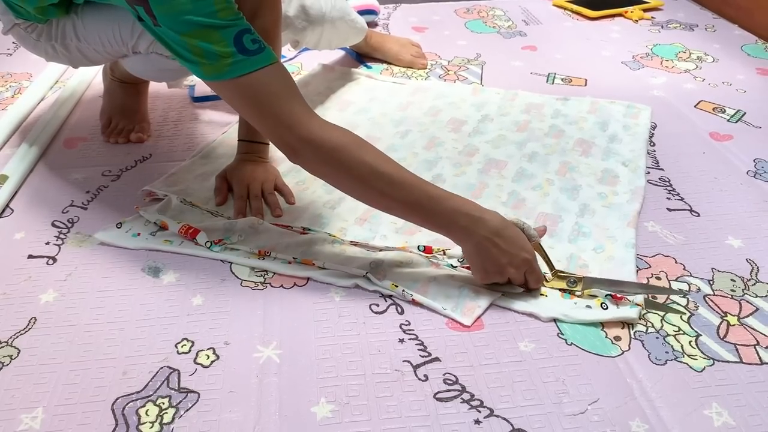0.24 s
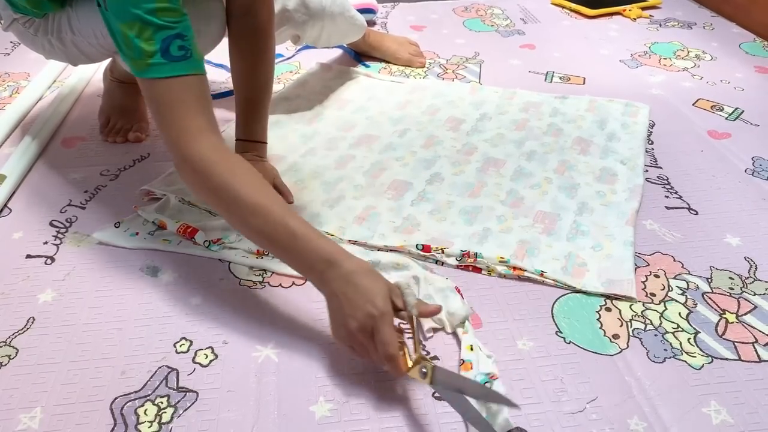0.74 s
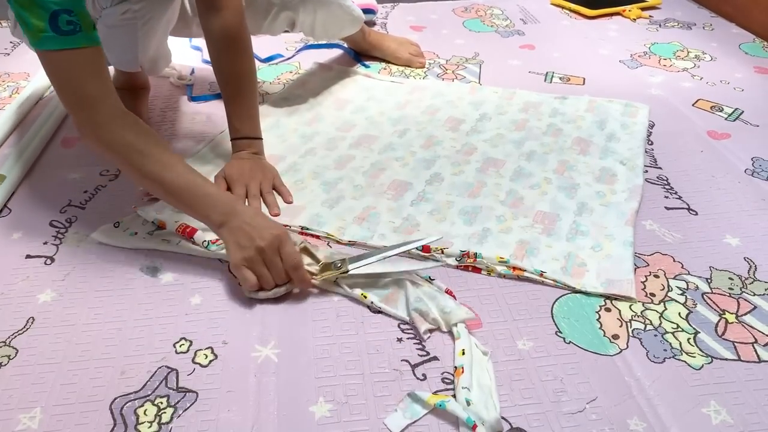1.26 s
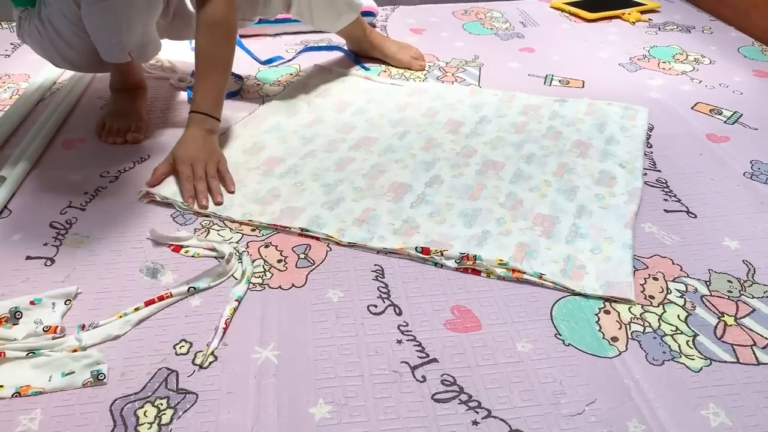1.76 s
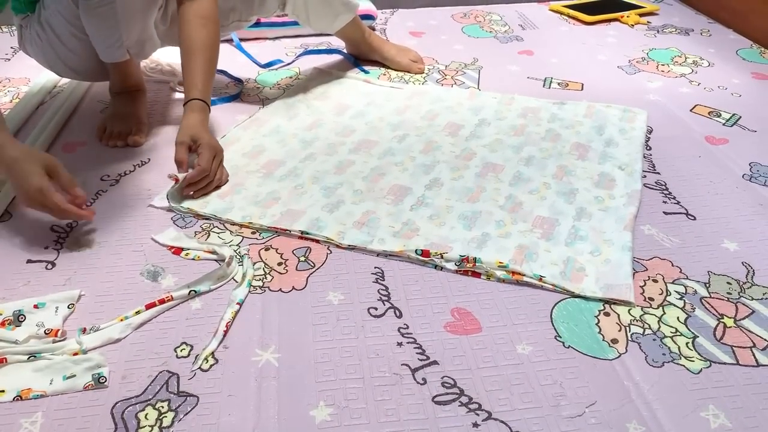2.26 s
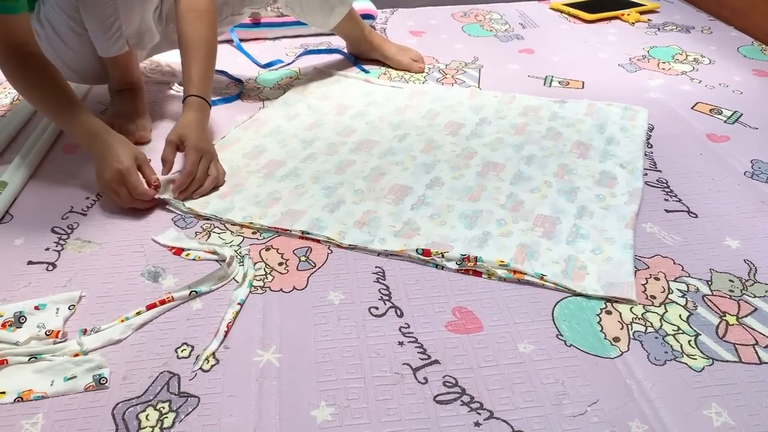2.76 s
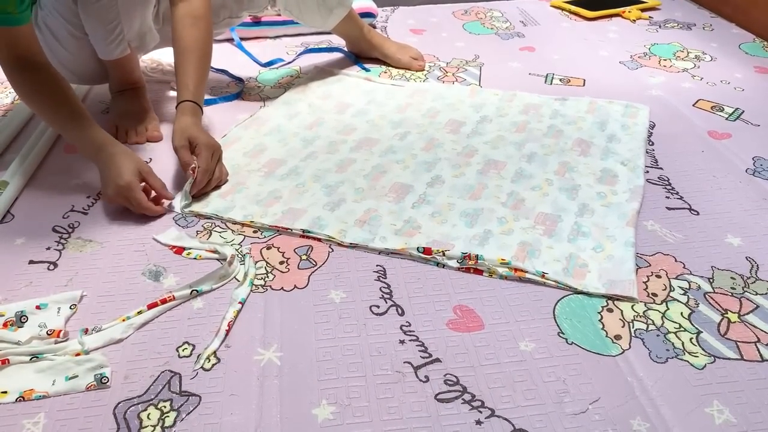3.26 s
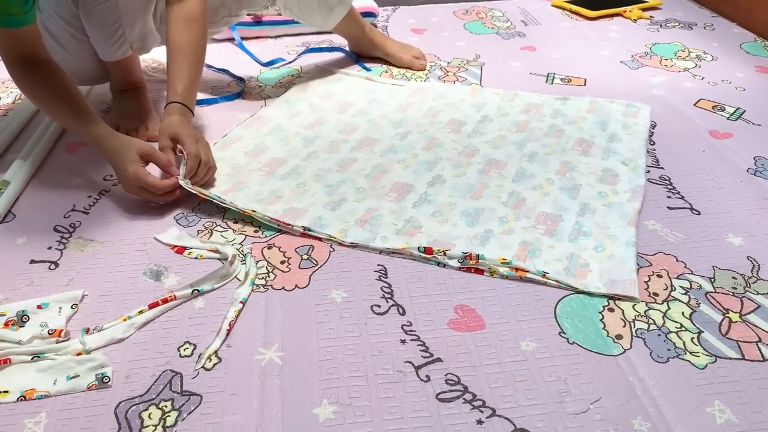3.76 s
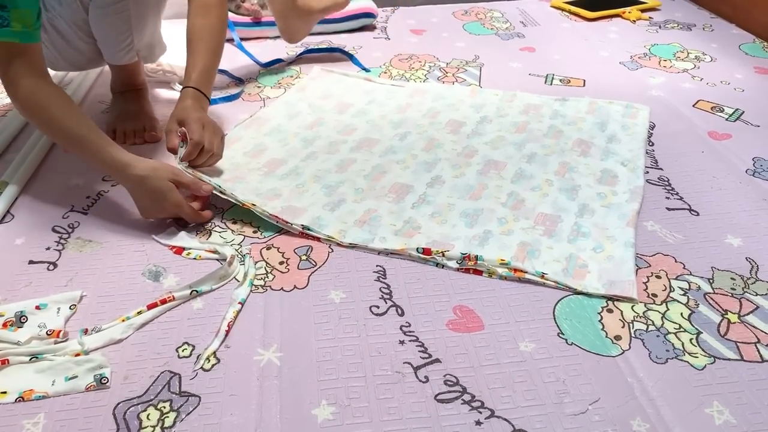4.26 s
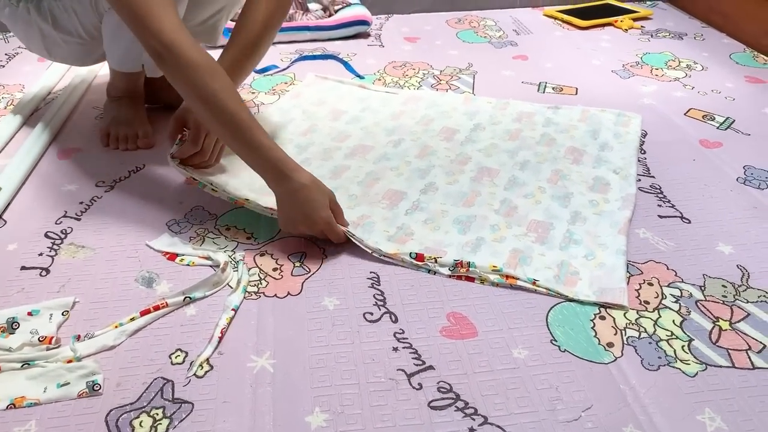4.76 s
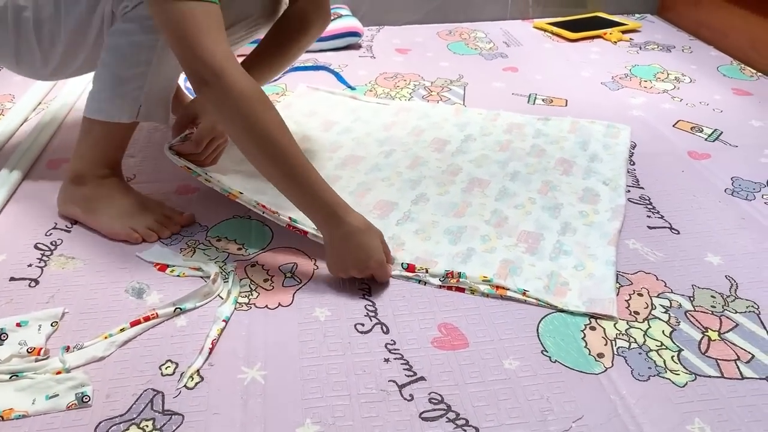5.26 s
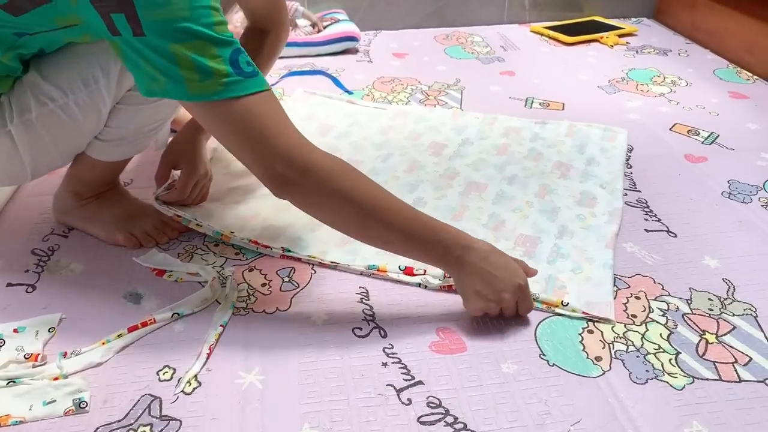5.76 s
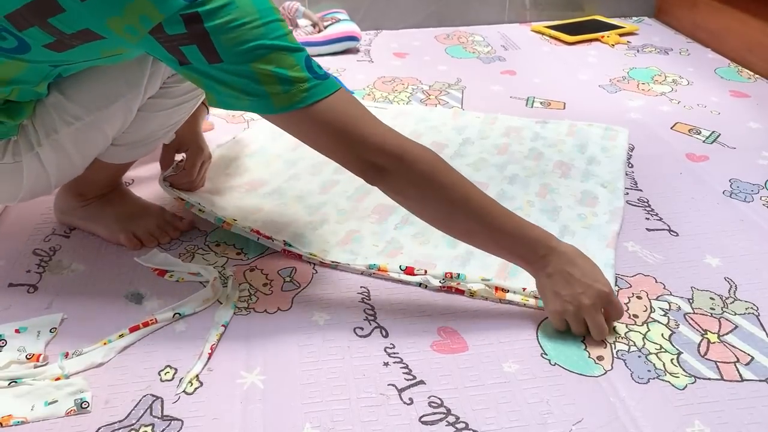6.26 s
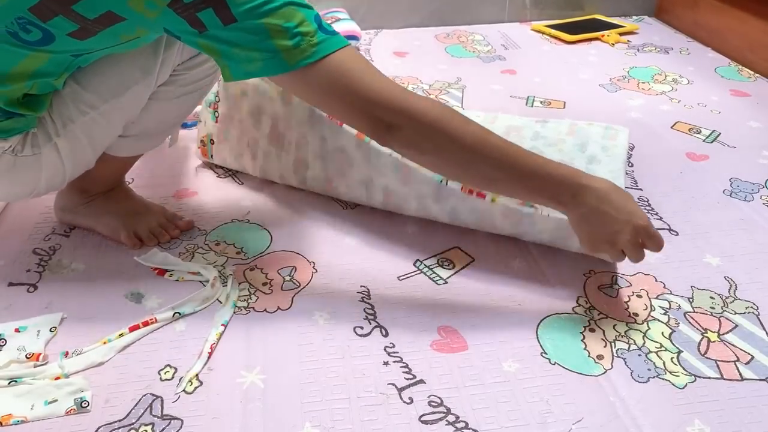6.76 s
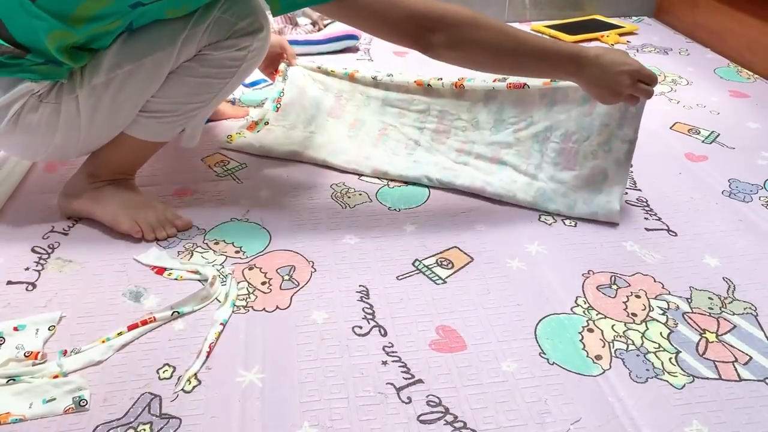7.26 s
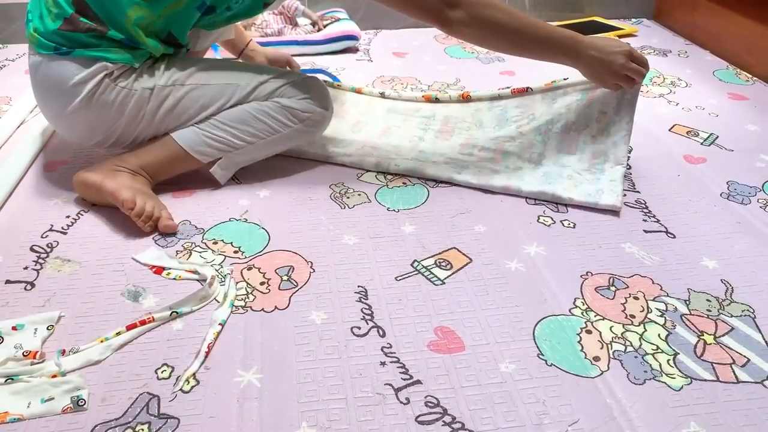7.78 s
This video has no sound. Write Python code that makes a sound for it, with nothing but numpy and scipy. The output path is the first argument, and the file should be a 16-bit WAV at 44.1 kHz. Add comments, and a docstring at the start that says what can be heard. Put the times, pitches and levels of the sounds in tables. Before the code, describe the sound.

Scissors snip crisply through cotton and clatter onto a foam mat, then hands rustle and sweep the cloth over a faint indoor hum.

```python
"""Scissors, cloth and foam mat

Large scissors finish a cut through cotton and are dropped on a foam mat; hands and feet then slide over
cloth and mat. Rubbing is band-filtered noise shaped by strokes; snips, drops and ticks are noise bursts in
damped resonances, answered by a hard-walled room. Heels and knees thud as decaying sines, a fan hums as
narrow noise bands in steady air noise, and a far horn gives a brief run of blasts from two overtones."""
import sys
import numpy as np
from scipy import signal
from scipy.fft import rfft, irfft, next_fast_len
from scipy.io import wavfile
from scipy.ndimage import uniform_filter1d, map_coordinates

SR = 44100
rng = np.random.default_rng(int(sys.argv[2]) if len(sys.argv) > 2 else 0)


def materialize(psi):
    """Save the field psi as 16-bit PCM at rate SR to the path in sys.argv[1].

    A 1-D psi becomes a single channel; in a 2-D psi each row is a channel.
    """
    bounded = np.clip(np.atleast_2d(psi).T, -1, 1)
    quanta = np.round(bounded * 32767).astype(np.int16)
    wavfile.write(sys.argv[1], SR, quanta)


N = 353682  # samples in the scene

# Spectrum of steady air and street noise: (frequency [Hz], relative level per Hz [dB])
AIR_SPECTRUM = [(12, -81.5), (28, -34), (48, -7.5), (113, 0), (171, -10), (343, -8.5), (507, -19.5),
                (689, -16), (1780, -30.5), (3770, -46), (6000, -52), (16000, -60)]
AIR_LEVEL_DB = -49
# Hum bands of the fan: (centre [Hz], width [Hz], rms level before any waver [dB])
FAN_BANDS = [(47.3, 12, -59), (104.5, 6, -49), (195, 25, -65.5), (358, 100, -63), (682, 55, -69)]
# Random waver of the strongest hum band, as narrow noise has, used relative to its mean:
# (time [s], level [dB])
HUM_WAVER = [(0.0, -45.5), (1.54, -57), (1.79, -40), (1.96, -55), (2.26, -48), (2.72, -61), (2.88, -40.5),
             (2.95, -50.5), (5.43, -43), (5.69, -52), (6.59, -44), (8.02, -50)]
# Correlation of left and right in diffuse noise: (frequency [Hz], likeness [0 to 1])
LIKENESS = [(60, 0.92), (180, 0.96), (550, 0.61), (1650, 0.053), (4970, 0.016), (15000, 0.037)]

# Strokes of hands, feet and blades over cloth and mat: (time at full level [s], rise [s], hold [s],
# drift over the hold [dB], scrape level [dB], swish, hiss and rasp levels above the scrape [dB, dB, dB])
STROKES = [(0.078, 0.33, 0.079, -16, -54, -3, 9, -18), (0.213, 0.012, 0.035, 1, -69.5, -4, 3, -3),
           (0.485, 0.057, 0.028, 7, -47.5, -7, -5.5, -3), (0.51, 0.192, 0.11, 11, -57, -7.5, -6, -12),
           (0.717, 0.006, 0.037, 3, -67.5, -13, -5, -14), (0.973, 0.015, 0.031, -10, -54, -6, -1, 5),
           (1.069, 0.081, 0.22, -16, -33, -12.5, -17, -3), (1.401, 0.28, 0.28, -7, -44.5, -8.5, -8.5, -13),
           (1.778, 0.042, 0.08, -11, -40, -15, -15, -3.5),
           (1.922, 0.055, 0.0039, 6.5, -52.5, -9, -1.5, -13), (2.337, 0.027, 0.082, -9, -62.5, 1, -6.5, -2),
           (2.529, 0.12, 0.067, 3, -54, -2.5, -4, -9), (2.606, 0.009, 0.16, -20, -41, -8.5, -9, 0.5),
           (2.8, 0.077, 0.036, -4, -41.5, -7, -7.5, -8), (3.188, 0.016, 0.085, 2, -73, -9.5, -13.5, -18),
           (3.328, 0.014, 0.039, 5, -80.5, -7, -8.5, -19.5),
           (3.558, 0.075, 0.094, -17.5, -79.5, 4.5, -9, -14.5),
           (3.891, 0.032, 0.11, -10.5, -51, 2.5, -8, -11), (4.321, 0.077, 0.17, 3, -56.5, -6, -4, -11),
           (4.483, 0.015, 0.18, 4.5, -67, -8.5, 0.5, -9), (4.741, 0.048, 0.32, 12, -74, 9, 9, -13),
           (4.848, 0.052, 0.15, -10.5, -39, 5, 1, -1), (4.936, 0.1, 0.34, -16.5, -35.5, -8, -15, -5),
           (5.161, 0.0055, 0.29, -8.5, -42.5, -2, -5, -2.5), (5.54, 0.44, 0.24, 6.5, -67, -5.5, -3, -25),
           (5.772, 0.04, 0.21, -2, -60.5, 1.5, 6.5, -15), (6.005, 0.43, 0.1, -12.5, -52, -8.5, -8, -7.5),
           (6.29, 0.188, 0.039, -8, -53.5, -12, -9, -8), (6.353, 0.021, 0.064, -3, -57, -22, -9.5, -0.5),
           (6.604, 0.068, 0.049, -5, -58.5, 0, -6.5, -9), (6.855, 0.15, 0.134, -1, -69, -5, -12, 0.5),
           (7.077, 0.083, 0.011, -5.5, -67, 2, 3, -7), (7.167, 0.038, 0.023, 0, -78.5, -2.5, -0.5, 1.5),
           (7.28, 0.055, 0.15, -24.5, -59.5, 2, 1, -22), (7.474, 0.066, 0.006, -6, -71, 7, -18, -6),
           (7.592, 0.13, 0.03, -2, -60, 2.5, 0.5, -8), (7.771, 0.32, 0.105, 11, -76.5, -3.5, -12, -5),
           (7.886, 0.048, 0.049, -1, -62.5, -8.5, -10.5, -1.5)]
# Rubbing bands scrape, swish, hiss, rasp: (low edge [Hz], high edge [Hz], fade after the stroke [dB/s])
RUBBING_BANDS = [(2300, 4490, 107), (5030, 6860, 130.5), (8300, 14000, 229), (1060, 2630, 90)]
# Spectrum of rubbed fabric: (frequency [Hz], relative level [dB])
FABRIC_SPECTRUM = [(500, -40), (900, -17), (1300, -15.5), (1900, -10), (2500, -5), (3500, -1), (4600, -3),
                   (5500, -6.5), (8000, -4), (16000, -14)]
STROKE_RISE_DB = 30  # climb during the rise

# Snips, drops and ticks, levels before the common gains below:
# (time [s], level [dB], ring [Hz], treble crack [dB], low knock [dB])
TICKS = [(0.22, -55, 6500, 12.5, -25), (0.376, -39.5, 2000, -16, -22), (0.482, -25.5, 3700, -14.5, -31),
         (0.4953, -21.5, 2120, -18.5, -39), (0.5096, -5, 2590, -9.5, -36), (0.52, -14, 4050, -26, -27),
         (0.9669, -16.5, 2620, -13, -34), (0.988, -34, 5100, -18.5, -28), (1.0229, -13.5, 3000, -9.5, -22),
         (1.0314, -4, 3270, -14, -26), (1.037, 2, 3800, -10, -20.5), (1.043, -11, 3170, -24, -10),
         (1.0487, -12, 4100, -18.5, -16), (1.0549, -3, 2640, -10, -18.5), (1.0686, -17.5, 2705, -22, -12.5),
         (1.2414, -38, 2980, -17, -21), (1.377, -16, 4940, -32, -35), (1.683, -30.5, 1460, -27, -10.5),
         (1.7734, -13, 4040, -19, -33), (1.9321, -21, 4090, -10, -35), (2.3285, -36.5, 2520, -7, -18),
         (2.583, -30, 4680, 8, -27), (2.591, -15.5, 5200, -4.5, -21.5), (2.6146, -23, 2600, -19, -27),
         (2.7818, -16.5, 4370, -8, -42), (3.8751, -36.5, 4150, -8.5, -24), (3.8879, -27, 4630, -2, -33),
         (4.797, -35, 6680, 3.5, -27), (4.8204, -28, 6000, 5.5, -32), (4.8522, -17, 3300, -3.5, -13.5),
         (4.982, -10.5, 2490, -13, -40), (5.1633, -13.5, 4030, -25.5, -20),
         (5.1698, -13.5, 2860, -25.5, -18), (5.982, -19.5, 3610, -22, -36), (6.268, -30, 3370, -25, -30),
         (6.3575, -30, 3400, -16, -29.5), (6.3787, -25, 3000, -26, -34), (6.4449, -32, 2600, -22, -16),
         (6.6036, -37.5, 6500, -20.5, -24), (7.0667, -40, 6500, 0, -23), (7.267, -29, 4140, -1.5, -31),
         (7.3111, -47, 3380, 9, -21), (7.4145, -62, 6030, 6, -25), (7.4496, -37, 6000, -31, -23),
         (7.5131, -55.5, 5940, 11, -23.5), (7.5478, -46.5, 6210, 8.5, -12.5),
         (7.5752, -29.5, 5700, -1.5, -29.5), (7.8148, -48, 5760, -30, -22.5)]
TICK_GAIN_DB, CRACK_GAIN_DB, KNOCK_GAIN_DB = 16.5, -5.5, 9.5
TICK_T60_S, TICK_BODY_DB, TICK_ROOM_DB = .013, -9, -13.5
# Path difference as the hands move: (time [s], lag of the left port [ms])
HAND_LAG = [(0, 0.28), (.9, 0.18), (1, -0.24), (1.9, -0.45), (2.4, 0.309), (8, 0.27)]
# Reverberation of the hard walls: (frequency [Hz], t60 [s])
WALL_DECAY = [(300, 0.78), (1300, 0.14), (3500, 0.23), (9000, 0.35), (15000, 0.21)]

# Heels and knees on the floor, levels before the common gain: (time [s], level [dB], pitch [Hz], t60 [s])
THUDS = [(1.037, -40, 191, 0.089), (1.78, -29, 121, 0.14), (1.777, -30, 194, 0.086),
         (2.279, -25, 108, 0.062), (4.152, -15.5, 58.9, 0.12), (4.216, -29, 45.7, 0.23),
         (5.168, -32, 189, 0.12)]
THUD_GAIN_DB = 3.5

# Blasts of the horn: (start [s], length [s], level [dB])
HORN_BLASTS = [(2.14, .03, -76.5), (2.18, .16, -63.5), (2.355, 0.046, -64), (2.428, 0.077, -65)]
# Overtones that carry: (multiple of the fundamental [1], level [dB])
HORN_TONES = [(7, -5.5), (8, -5)]
HORN_HZ, HORN_EDGE_S = 479, .02

# Treble colour of the whole sound: (frequency [Hz], gain [dB])
TREBLE_COLOUR = [(7500, 0.5), (8700, -1.5), (10300, 7.5), (11450, 1), (11950, -11), (12500, 5.5),
                 (14000, 3.5), (14700, -8), (15800, -20)]
BAND_LIMIT_HZ = 15795


def amp(db):
    """Decibel law: the amplitude factor of a level in dB."""
    return 10 ** (np.asarray(db) / 20)


def unit(x):
    """Power normalisation: x at rms 1."""
    return x / np.sqrt(np.mean(x ** 2) + 1e-20)


def along(points, hz):
    """Logarithmic frequency scale: (Hz, value) points interpolated on it."""
    f, v = np.transpose(points)
    return np.interp(np.log(hz + 1), np.log(f + 1), v)


def wobble(rate):
    """Band-limited fluctuation: a smooth random curve through `rate` knots a second."""
    knots = rng.standard_normal(int(N * rate / SR) + 4)
    return map_coordinates(knots, [np.arange(N) * rate / SR])


def filtered(x, response):
    """Linear filtering: the spectrum of x times a response of frequency."""
    m = next_fast_len(x.shape[-1] + 8192)
    spectrum = rfft(x, m) * response(np.fft.rfftfreq(m, 1 / SR))
    return irfft(spectrum, m)[..., :x.shape[-1]]


def mode(f, hz, width):
    """Damped oscillator: the response of a causal resonance with peak gain 1."""
    return 1j * f * width / (hz * hz - f * f + 1j * f * width + 1e-9)


def diffuse(gain, patchy_db=0):
    """Diffuse field: stereo noise of rms 1 in random patches, alike on both sides only in the bass."""
    cells = signal.stft(rng.standard_normal((2, N)), nperseg=512)[2]
    patches = rng.standard_normal(cells.shape[1:])
    patches = uniform_filter1d(uniform_filter1d(patches, 3, 0), 6, 1)
    pair = signal.istft(cells * amp(patchy_db * unit(patches)), nperseg=512)[1][:, :N]
    # the mid/side mixing angle sets the left-right correlation
    turn = lambda f: np.arccos(np.clip(along(LIKENESS, f), -1, 1)) / 2
    mid, side = filtered(pair, lambda f: gain(f) * [np.cos(turn(f)), np.sin(turn(f))])
    return unit(np.array([mid + side, mid - side]))


def room_tone():
    """Broadband noise and narrow-band hum: steady air plus fuzzy fan bands, a little louder right."""
    bands = []
    for hz, width, db in FAN_BANDS:
        bands.append(amp(db) * diffuse(lambda f: np.abs(mode(f, hz, width)) ** 2))
    low, main, *upper = bands
    waver_db = np.interp(np.arange(N) / SR, *np.transpose(HUM_WAVER))
    main = main * amp(waver_db - waver_db.mean())
    air = amp(AIR_LEVEL_DB) * diffuse(lambda f: amp(along(AIR_SPECTRUM, f)), patchy_db=1.93)
    return (air + low + main + sum(upper)) * amp([[-.4], [.4]])


def rubbing():
    """Stick-slip friction: fibres catch and slip in fine grains; the hiss fades fastest after a stroke."""
    columns = np.transpose(STROKES)[:, :, None]
    full, rise, hold, drift_db, scrape_db, swish_db, hiss_db, rasp_db = columns
    t = np.arange(0, N / SR + .002, .001)  # 1 ms grid for the envelopes
    slips_db = 2.1 * wobble(14) + 0.91 * wobble(55) + 0.55 * wobble(400)
    since, held = t - full, np.maximum(hold, .005)
    rise_db = STROKE_RISE_DB * np.minimum(since, 0) / np.maximum(rise, .004)
    hold_db = drift_db * np.clip(since / held, 0, 1)
    out = np.zeros((2, N))
    for (low_hz, high_hz, fade), above_db in zip(RUBBING_BANDS, [0, swish_db, hiss_db, rasp_db]):
        shape_db = rise_db + hold_db - fade * np.maximum(since - held, 0)
        # overlapping strokes add in power
        level = np.linalg.norm(amp(scrape_db + above_db + shape_db), axis=0)
        edges = lambda f: np.sqrt((1 + (low_hz / (f + 1)) ** 14) * (1 + (f / high_hz) ** 14))
        noise = diffuse(lambda f: amp(along(FABRIC_SPECTRUM, f)) / edges(f), patchy_db=3.0)
        out += np.interp(np.arange(N) / SR, t, level) * noise
    return out * unit(amp(slips_db))


def walls(length=SR // 2):
    """Reverberation: a fresh stereo tail, left energy 1, each frequency decaying at its own rate."""
    hz, t, cells = signal.stft(rng.standard_normal((2, length)), SR, nperseg=256)
    decay = amp(-60 * t / along(WALL_DECAY, hz)[:, None])
    tail = signal.istft(cells * decay, SR, nperseg=256)[1]
    return tail / np.linalg.norm(tail[0])


def ticks():
    """Impact excitation: brief chatter drives a ring, a broad body, a crack and a knock, then the room."""
    out, t = np.zeros((2, N + SR)), np.arange(SR // 16) / SR
    shape = amp(-60 * t / TICK_T60_S) * (1 - np.exp(-t / 0.0014)) ** 2
    for s, db, hz, crack_db, knock_db in TICKS:
        shared, *own = rng.standard_normal((3, len(t)))
        # bounces off the mat make the two ports hear only partly the same burst
        burst = shape * (shared + 1.5 * np.array(own))
        burst /= np.linalg.norm(burst, axis=1, keepdims=True)
        burst[:, round(.0012 * SR)] += .65  # the hard moment of contact

        ring = lambda f: mode(f, hz, 0.27 * hz) ** 2
        body = lambda f: amp(TICK_BODY_DB) * mode(f, 2500, 3400) ** 2
        crack = lambda f: amp(crack_db + CRACK_GAIN_DB) * mode(f, 11800, 5400) ** 2
        knock = lambda f: amp(knock_db + KNOCK_GAIN_DB) * mode(f, 950, 2000) ** 3
        colour = lambda f: ring(f) + body(f) - crack(f) - knock(f)

        lag_ms = np.interp(s, *np.transpose(HAND_LAG))
        delay_ms = [[lag_ms], [0]] - np.minimum(lag_ms, 0)  # the nearer port has no delay
        spacing = lambda f: np.exp(-2j * np.pi * f * delay_ms / 1000)
        hit = amp(db + TICK_GAIN_DB) * filtered(burst, lambda f: colour(f) * spacing(f))
        late = np.pad(hit[:1], ((0, 0), (180, 0)))  # the room answers 180 samples later
        echo = amp(TICK_ROOM_DB) * signal.fftconvolve(late, walls(), axes=1)
        start = round(s * SR)
        out[:, start:start + len(t)] += hit
        out[:, start:start + echo.shape[1]] += echo
    return out[:, :N]


def thuds():
    """Damped low-frequency vibration: soft weight on the floor gives one slowly rising boom."""
    out, t = np.zeros(N + SR), np.arange(SR // 2) / SR
    for s, db, hz, t60 in THUDS:
        decay = amp(db + THUD_GAIN_DB - 60 * t / t60)
        rise = 1 - np.exp(-t * hz / 1.2)
        out[round(s * SR):][:len(t)] += decay * np.sin(2 * np.pi * hz * t) * rise
    return out[:N]


def horn():
    """Harmonic series: only two overtones of a far horn reach the room, wavering on each side."""
    t = np.arange(N) / SR
    sides = []
    for side in "LR":
        tones = []
        for k, db in HORN_TONES:
            level = amp(db + 3.8 * wobble(29.8))
            tones.append(level * np.sin(2 * np.pi * k * HORN_HZ * t + 0.49 * wobble(10)))
        sides.append(sum(tones))
    blasts = np.zeros(N)
    for s, length, db in HORN_BLASTS:
        inside = np.minimum(t - s, s + length - t)  # time to the nearer end
        blasts += amp(db) * np.clip(inside / HORN_EDGE_S + .5, 0, 1)
    return blasts * np.array(sides)


def scene():
    """Superposition: all sources add at the two microphone ports."""
    return room_tone() + rubbing() + ticks() + thuds() + horn()


def record(dry):
    """Frequency response: a fixed curve colours the treble; nothing is kept above the band limit."""
    return filtered(dry, lambda f: amp(along(TREBLE_COLOUR, f)) * (f < BAND_LIMIT_HZ))


dry = scene()
out = record(dry)
materialize(out)
```